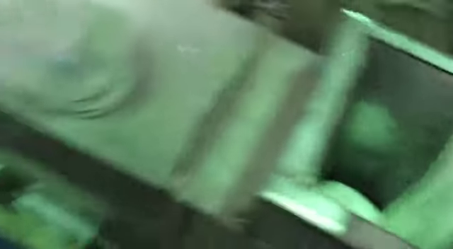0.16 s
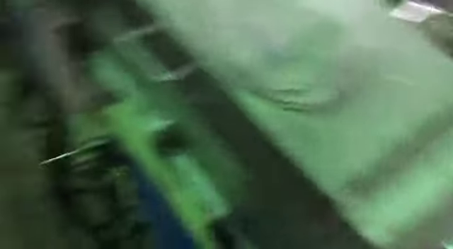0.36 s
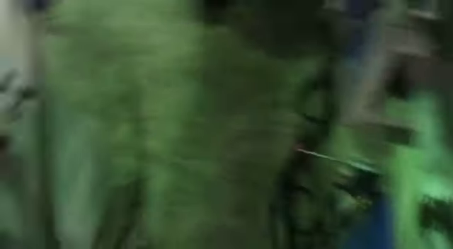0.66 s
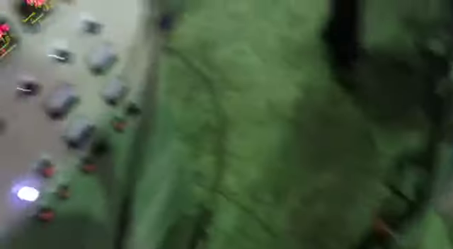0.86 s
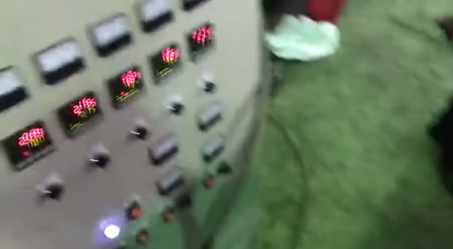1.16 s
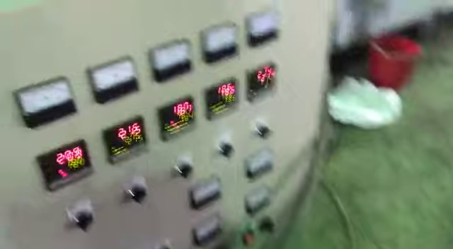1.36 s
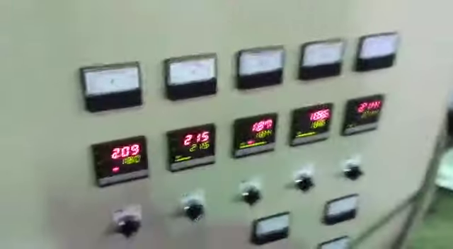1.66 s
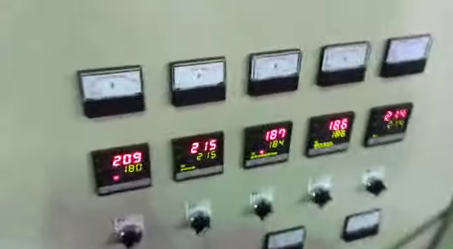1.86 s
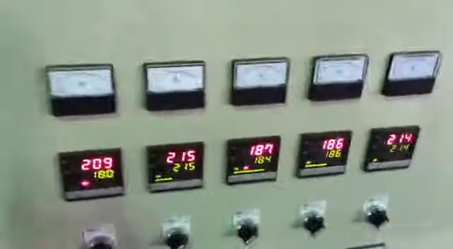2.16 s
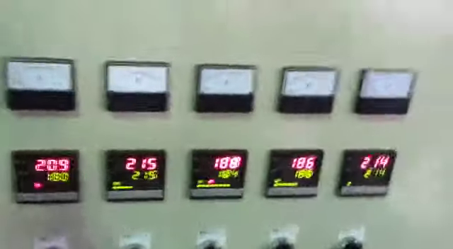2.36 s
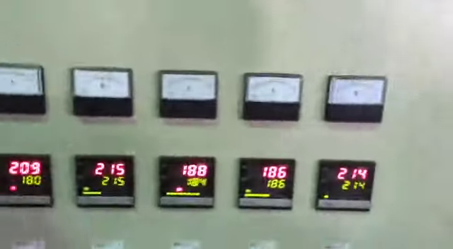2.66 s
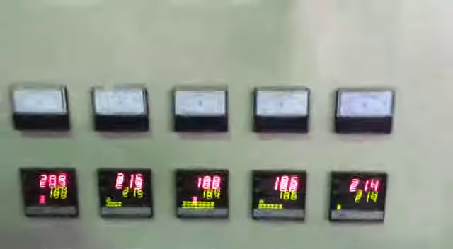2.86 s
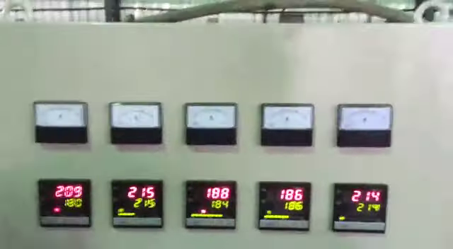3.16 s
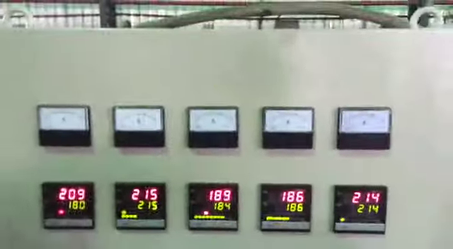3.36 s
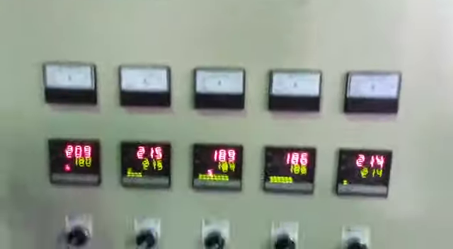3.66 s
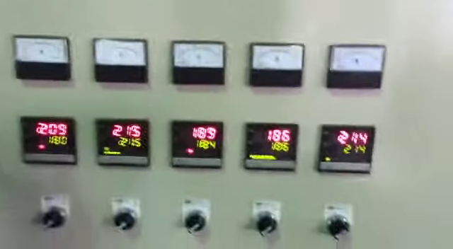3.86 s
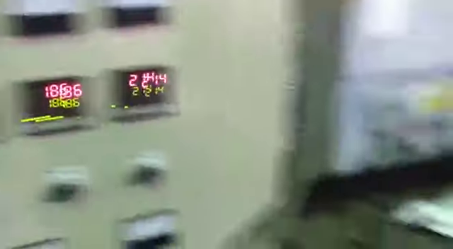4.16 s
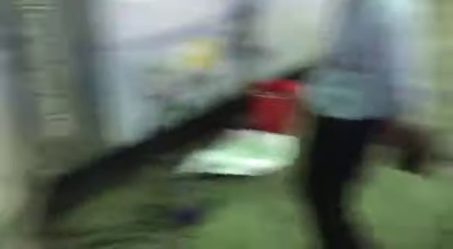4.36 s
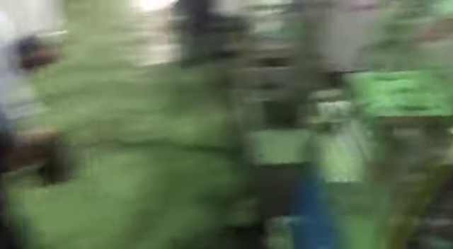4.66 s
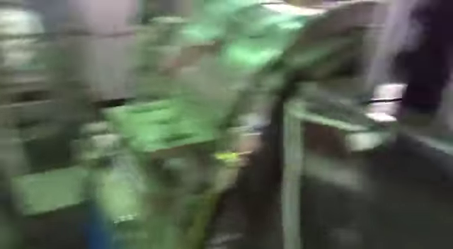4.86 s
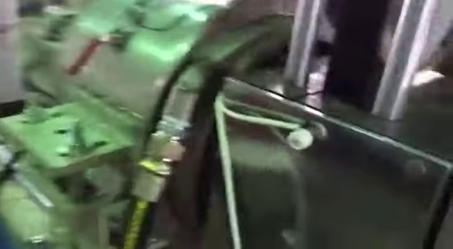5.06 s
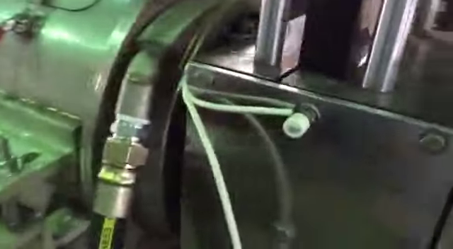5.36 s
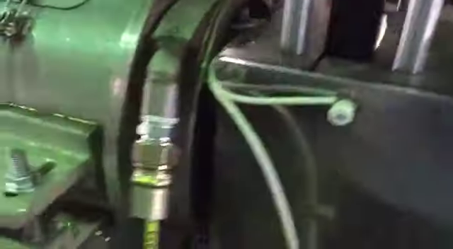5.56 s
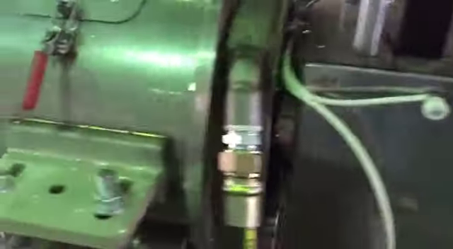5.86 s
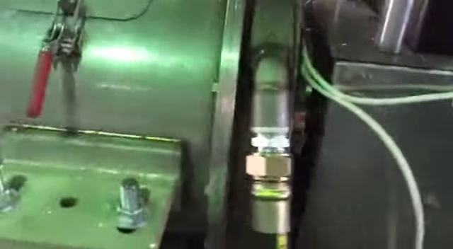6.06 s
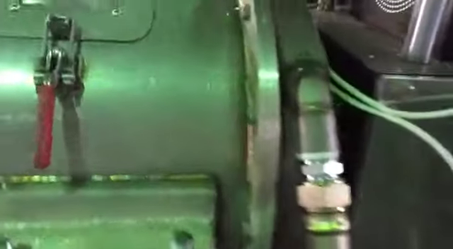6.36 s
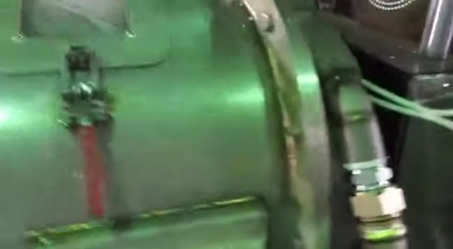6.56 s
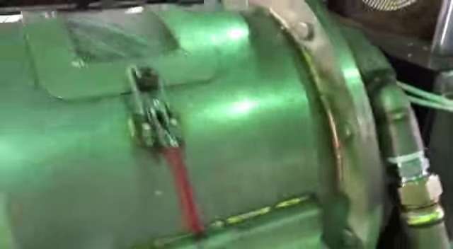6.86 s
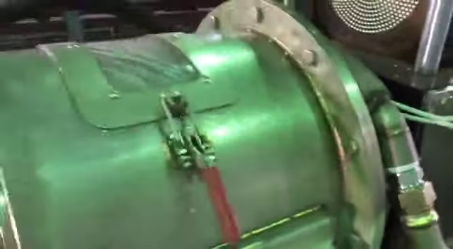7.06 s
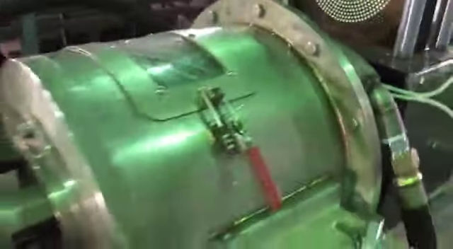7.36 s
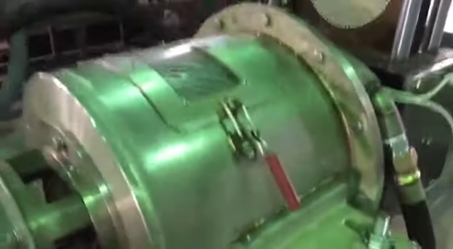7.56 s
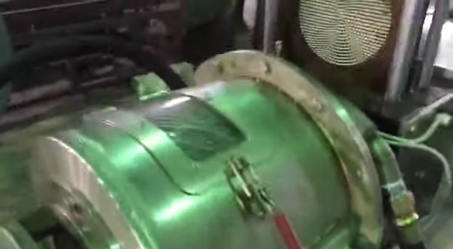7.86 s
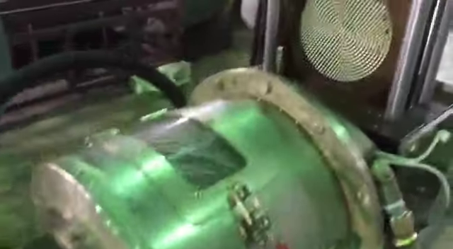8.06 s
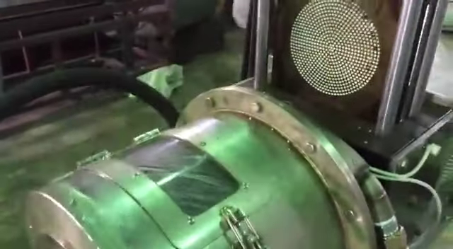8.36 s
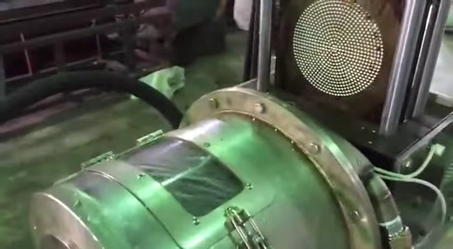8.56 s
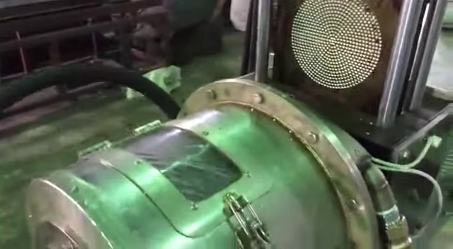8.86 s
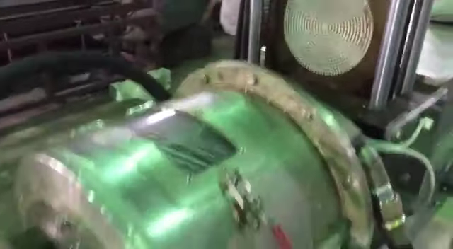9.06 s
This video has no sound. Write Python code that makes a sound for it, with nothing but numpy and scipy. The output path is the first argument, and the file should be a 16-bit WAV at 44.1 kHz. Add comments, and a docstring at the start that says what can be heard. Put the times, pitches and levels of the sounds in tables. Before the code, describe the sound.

Inside a busy workshop, a plastic recycling machine runs without pause. A low, hollow drone throbs irregularly over rumble, motor hum and a rushing blower, while water churns, pellets patter and spray hisses in quick surges. Brief mid-pitched whines rise and fade. One handheld microphone moves from a control panel to a steel drum, with only slight changes in balance.

```python
"""Plastic recycling line in a workshop

A hollow, unsteady drone throbs over motor hum, brief whines and the noise of the hall, while water churns
in a steel drum, pellets patter and a fine spray hisses in quick surges. One microphone is carried from the
control panel to the cutter drum. Tones are drifting sines; air and water are noise shaped by spectra;
the drone is a sung note beating against noise that rings the drum."""
import sys
import numpy as np
from scipy import signal
from scipy.fft import rfft, irfft, next_fast_len
from scipy.io import wavfile
from scipy.ndimage import uniform_filter1d, map_coordinates

SR = 44100
rng = np.random.default_rng(int(sys.argv[2]) if len(sys.argv) > 2 else 0)


def store_wav(level_fs):
    """Save 16-bit WAV to argv[1]."""
    pcm = np.round(np.clip(np.atleast_2d(level_fs), -1, 1) * 32767)
    wavfile.write(sys.argv[1], SR, pcm.T.astype(np.int16))


N = 406161  # length [samples]


def amp(db):
    """Turn decibels into a gain."""
    return 10 ** (np.asarray(db) / 20)


def unit(x):
    """Scale a sound to rms 1."""
    return x / np.sqrt(np.mean(x ** 2) + 1e-20)


def curves(rows):
    """Draw straight lines through a table: one curve for each column after the time."""
    times, *columns = np.transpose(rows)
    return [np.interp(np.arange(N) / SR, times, column) for column in columns]


def wobble(rate):
    """A smooth random curve through `rate` random points a second."""
    n = np.arange(0, N + 64, 64)  # worked out every 64 samples, straight lines between
    points = rng.standard_normal(4000)
    curve = map_coordinates(points, [n * rate / SR + 2], mode="wrap")
    return np.interp(np.arange(N), n, curve)


def swell(start, length, attack_s, release_s):
    """An envelope that rises until start, holds for length and falls again."""
    corners = np.cumsum([start - abs(attack_s), abs(attack_s), abs(length), abs(release_s)])
    return np.interp(np.arange(N) / SR, corners, [0, 1, 1, 0])


def filtered(x, response):
    """Multiply the spectrum of a sound by a gain that depends on frequency."""
    m = next_fast_len(N + SR // 2)
    hz = np.fft.rfftfreq(m, 1 / SR)
    return irfft(rfft(x, m) * response(hz), m)[:N]


def coloured(x, spectrum):
    """Shape a sound by a spectrum table, joined up on a log frequency axis, at rms 1."""
    f, db = np.transpose(spectrum)
    return unit(filtered(x, lambda hz: amp(np.interp(np.log(hz + 1), np.log(f), db))))


def turbulence(patchy_db):
    """White noise with short patches of random gain in time and frequency."""
    z = signal.stft(rng.standard_normal(N), nperseg=512)[2]
    field = uniform_filter1d(rng.standard_normal(z.shape), size=10, axis=0)
    field = uniform_filter1d(field, size=9, axis=1)
    return signal.istft(z * amp(patchy_db * unit(field)), nperseg=512)[1][:N]


def tone(hz, wander_hz, rate):
    """A sine of rms 1 whose pitch drifts at random."""
    cycles = np.cumsum(hz + wander_hz * wobble(rate)) / SR
    return np.sqrt(2) * np.sin(2 * np.pi * (cycles + rng.random()))


def patter(per_second, spread_db):
    """Tiny impacts at random moments and of random sizes."""
    struck = rng.random(N) < per_second / SR
    sizes = rng.standard_normal(N) * amp(spread_db * rng.standard_normal(N))
    return unit(struck * sizes)


def ribbed(x, depth_db, spacing_hz):
    """The many close modes of a steel shell comb a sound with narrow fixed peaks."""
    peaks = rng.uniform(-1.1, 1, size=4000)
    return unit(filtered(x, lambda hz: amp(depth_db * map_coordinates(peaks, [hz / spacing_hz], mode="wrap"))))


def passing_walls(x, share, delay_s, sway_s, count=3):
    """Echoes from nearby panels and the floor, whose paths shift as the microphone is carried along."""
    n = np.arange(N)
    echoes = np.zeros(N)
    for k in range(count):
        delay = delay_s * (k + 1) + sway_s * wobble(.9)
        echoes += np.interp(n - SR * delay, n, x)
    return unit(x + share * echoes)


LEAVE_PANEL_S, REACH_DRUM_S = 3.8, 5.1


def nearness():
    """The walk: 0 at the control panel, 1 beside the drum."""
    return np.interp(np.arange(N) / SR, [LEAVE_PANEL_S, REACH_DRUM_S], [0, 1])


# spectrum of the low rumble: (frequency [Hz], level [dB per Hz])
RUMBLE_SPECTRUM = [(10, -35), (22, -23), (45, -16.5), (70, -9), (110, -4.5), (160, -1.5), (220, -2.5),
                   (260, -11.5), (300, -10), (600, -45)]
RUMBLE_DB, RUMBLE_NEAR_DB = -25.5, 1  # at the panel, and the gain beside the drum


def rumble():
    """Machines rumble through the hall: low noise that slowly rises and falls."""
    level_db = RUMBLE_DB + RUMBLE_NEAR_DB * nearness() + 1.9 * wobble(4.6)
    return amp(level_db) * coloured(rng.standard_normal(N), RUMBLE_SPECTRUM)


# steady noise along the walk, before a fixed trim:
# (time [s], roar level [dB], blower level [dB], hiss level [dB])
RUSH_LEVELS = [(0, -29.5, -32.5, -35), (0.6, -28.5, -34.5, -37.0), (1.1, -27.5, -32.5, -35.5),
               (1.65, -26.0, -28.5, -35.5), (2.1, -29, -32.5, -38), (3, -26, -32, -36.5),
               (3.6, -25.5, -34, -33.5), (4.1, -24.5, -30.5, -34.5), (4.6, -24.5, -30.5, -31.5),
               (5.2, -26, -31, -32), (5.75, -25.5, -28.5, -32.5), (6.6, -26, -31, -34.5),
               (7.6, -26.5, -29.5, -34), (8.4, -28, -30.5, -33.0), (9.21, -27.5, -31, -34)]
# spectra of the machine roar, the blower, its duct and the air jet: (frequency [Hz], level [dB per Hz])
ROAR_SPECTRUM = [(120, -31), (240, -10), (300, -3), (338, -2), (364, 3), (390, -0.1), (420, -1.5),
                 (480, -3.5), (560, -4.5), (630, -4.5), (800, -12), (1400, -35), (4000, -45)]
BLOWER_SPECTRUM = [(300, -18), (600, -7), (720, 0), (800, -2.5), (860, 0.5), (960, 1), (1040, -1),
                   (1200, -1.5), (1500, -19.5), (4000, -43)]
DUCT_SPECTRUM = [(700, -28), (1100, -9), (1350, 1), (1580, -0.5), (1720, 2), (1950, -2.5), (2120, -6),
                 (2300, -5), (2800, -10.5), (4500, -17), (11000, -40)]
HISS_SPECTRUM = [(1000, -11), (3000, -4), (4500, -0.5), (6000, 0), (7500, 1), (8500, -2), (10400, 1.5),
                 (11000, -19)]
DUCT_DB, DUCT_NEAR_DB = -30, 1.25  # at the panel, and the gain beside the drum


def rush():
    """Machines roar, a blower rushes through its duct and an air jet hisses, all echoing off the walls."""
    roar_db, blower_db, hiss_db = curves(RUSH_LEVELS)
    duct_db = DUCT_DB + DUCT_NEAR_DB * nearness()
    roar = amp(roar_db - 0.48) * coloured(turbulence(patchy_db=1.32), ROAR_SPECTRUM)
    blower = amp(blower_db + 1.27) * coloured(turbulence(patchy_db=1.27), BLOWER_SPECTRUM)
    duct = amp(duct_db) * coloured(turbulence(patchy_db=1.65), DUCT_SPECTRUM)
    hiss = amp(hiss_db + 4.0) * coloured(turbulence(patchy_db=1.5), HISS_SPECTRUM)
    direct = roar + blower + duct + hiss
    # the echoes leave the overall level as it was
    return np.std(direct) * passing_walls(direct, share=0.13, delay_s=.009, sway_s=0.000505)


# faint hum of the heaters and gearbox, and whine of the motor drives: (frequency [Hz], level [dB])
HUM_TONES = [(119.8, -42), (134.5, -41), (149, -48), (484.5, -47), (1107.6, -50), (1382, -51), (2222, -62),
             (4160, -64), (7090, -57), (8002, -60), (8450, -46), (8700, -55)]


def hum():
    """Heaters, gearbox and drives hum faintly, each a sine that wavers a little in pitch and level."""
    out = np.zeros(N)
    for hz, db in HUM_TONES:
        out += amp(db + 1.4 * wobble(2.62)) * tone(hz, wander_hz=0.00149 * hz, rate=7)
    return out


# motor and pump tones: (frequency [Hz], level at the panel [dB], level at the drum [dB], wander [Hz])
MOTOR_TONES = [(74.5, -38.5, -40, .25), (89.9, -42, -33, .25), (242.6, -36.5, -36.5, 0.68),
               (327.2, -41, -43, 0.55), (689.4, -48, -42, 0.57)]
FADE_DB, FADE_PER_S = 2, 2.34  # size and pace of the fading


def motors():
    """Motors and pumps hum at drifting pitches, fading in and out in the standing waves of the hall."""
    out, near = np.zeros(N), nearness()
    for hz, panel_db, drum_db, wander_hz in MOTOR_TONES:
        level_db = panel_db + (drum_db - panel_db) * near
        level_db = level_db + FADE_DB * wobble(FADE_PER_S) + 0.68 * wobble(12)
        out += amp(level_db) * tone(hz, wander_hz, rate=6)
    return out


# moments when a shaft or pump tone rises above the hum:
# (start of full level [s], time held [s], frequency [Hz], level [dB])
SHAFT_WHINES = [(.52, 0.61, 701, -35.5), (0.813, 0.74, 329.3, -30.5), (1.17, 0.62, 648, -45),
                (1.4, .45, 677, -37.5), (2.85, 0.73, 698, -35.5), (3.05, 0.55, 708, -41),
                (3.7, .4, 242.5, -31.5), (4.1, .42, 688, -33.5), (4.18, .7, 708, -38),
                (5.73, 0.57, 689, -30.5), (6.0, 0.79, 328, -31.5), (6.75, 1.2, 691, -39.5),
                (7.95, 0.53, 331.8, -31.5)]
WHINE_ATTACK_S, WHINE_RELEASE_S = 0.12, 0.17


def shafts():
    """Each shaft or pump whine swells, holds its slightly wavering pitch and fades."""
    out = np.zeros(N)
    for start, length, hz, db in SHAFT_WHINES:
        envelope = swell(start, length, WHINE_ATTACK_S, WHINE_RELEASE_S)
        out += amp(db) * envelope * tone(hz, wander_hz=0.93, rate=10)
    return out * amp(1.4 * wobble(12))  # all waver together


# water round the cutter along the walk, before trims and surges:
# (time [s], churn level [dB], spray level [dB])
WATER_LEVELS = [(0, -32, -32.0), (0.5, -33, -35), (1.4, -30.5, -30.5), (2.3, -33, -35.0), (2.9, -29.5, -32),
                (3.5, -33, -34.5), (4.25, -32.5, -33), (4.6, -31, -29.0), (5.6, -30.5, -31),
                (6.3, -32.5, -31), (6.7, -29, -31.0), (7.1, -30.5, -32.5), (7.45, -27.5, -28.5),
                (8.3, -29.5, -31), (9.21, -29.5, -28)]
# spectra of the churn with its pellets, and of the spray: (frequency [Hz], level [dB per Hz])
CHURN_SPECTRUM = [(600, -23), (1400, -1.5), (2200, 4), (2800, 1.5), (4100, -2.5), (4450, -10), (7000, -10),
                  (11000, -27)]
SPRAY_SPECTRUM = [(3000, -42), (6000, -22), (7500, -6.5), (8050, 3), (8600, 3.5), (9300, 3), (10200, -3),
                  (11000, -13)]
SLAPS_PER_S, SLAP_SCATTER_PER_S, SLAP_DB = 9.6, 3.93, 1.15  # uneven slaps on the drum wall; rms depth
HEAVE_DB, HEAVE_PER_S = 0.34, 6.5  # the slower heaving of the water


def water():
    """Water slaps round the drum, flinging pellets at the wall and throwing off spray."""
    churn_db, spray_db = curves(WATER_LEVELS)
    pellets = turbulence(patchy_db=2.0) + 0.53 * patter(per_second=3500, spread_db=1.0)
    drops = turbulence(patchy_db=1.2) + 0.39 * patter(per_second=5400, spread_db=1.0)
    pellets = ribbed(coloured(pellets, CHURN_SPECTRUM), depth_db=3.5, spacing_hz=45.27)
    drops = ribbed(coloured(drops, SPRAY_SPECTRUM), depth_db=4.5, spacing_hz=45.0)
    # one surge drives both pellets and spray; each breaks it into quicker splashes of its own
    slaps_db = SLAP_DB * tone(SLAPS_PER_S, wander_hz=SLAP_SCATTER_PER_S, rate=12)
    surge_db = slaps_db + HEAVE_DB * wobble(HEAVE_PER_S)
    churn = amp(churn_db - 1.07 + surge_db + 1.5 * wobble(40)) * pellets
    spray = amp(spray_db - 1.0 + 0.8 * surge_db + 1.43 * wobble(32)) * drops
    return churn + spray


# the drone between its strongest throbs, before flutter and trim: (time [s], level [dB])
DRONE_LEVELS = [(0, -18.5), (2.3, -23.5), (3.8, -22), (4.8, -23), (5.5, -23.5), (6.2, -20.5), (7.2, -24),
                (8.2, -22), (9.21, -20.5)]
# its strongest throbs, before trim: (start of full level [s], time held [s], level [dB])
DRONE_THROBS = [(0.11, 0.064, -17.5), (0.282, 0.14, -12.5), (0.547, 0.045, -17.5), (0.66, 0.091, -19),
                (0.86, 0.19, -17), (1.18, 0.032, -17), (1.517, 0.094, -15.5), (1.796, 0.14, -17.5),
                (2.031, 0.32, -15.5), (2.654, 0.099, -16), (3.087, 0.15, -16.5), (3.568, 0.11, -17.5),
                (4.177, 0.11, -18.5), (6.095, 0.093, -16), (6.306, 0.032, -17.5), (6.404, 0.042, -18),
                (7.629, 0.05, -17), (7.984, 0.054, -16), (8.774, 0.036, -17), (9.025, 0.039, -13.5)]
THROB_DB, THROB_ATTACK_S, THROB_RELEASE_S = 0.17, 0.016, 0.026  # THROB_DB trims every throb
LULL_AFTER_S, LULL_S, LULL_DB = 0.055, 0.021, -5  # each throb collapses into a short lull
FLUTTER_DB, FLUTTER_PER_S = 2.5, 26  # the lesser throbs in between


def throbbing():
    """The drone's level in dB: flutter, then lulls, then the strongest throbs laid over both."""
    level_db = curves(DRONE_LEVELS)[0] + FLUTTER_DB * wobble(FLUTTER_PER_S)
    for start, length, _ in DRONE_THROBS:
        lull_start = start + length + LULL_AFTER_S
        level_db = level_db + LULL_DB * swell(lull_start, LULL_S, THROB_RELEASE_S, THROB_ATTACK_S)
    for start, length, db in DRONE_THROBS:
        envelope = swell(start, length, THROB_ATTACK_S, THROB_RELEASE_S)
        level_db = level_db + (db + THROB_DB - level_db) * envelope
    return level_db


# resonances of the drum and its pipes: (frequency [Hz], width [Hz], level [dB])
DRUM_RESONANCES = [(174.6, 14, -2), (189.7, 20, 2), (163.8, 5.4, -5), (204, 30, -13)]


def drum_response(f):
    """The gain of the steel drum: a few resonance peaks added as power."""
    power = 0
    for hz, width, db in DRUM_RESONANCES:
        power = power + amp(db) ** 2 / (1 + (2 * (f - hz) / width) ** 2) ** 2.0
    return np.sqrt(power)


def drone():
    """The spinning cutter sings one unsteady note; turbulence rings the drum around it, and the two beat."""
    level_db = throbbing()
    swell_db = level_db - np.mean(level_db)
    note = tone(180.5, wander_hz=1.67, rate=10)
    ring = unit(filtered(rng.standard_normal(N), drum_response))
    # the note stands out in the swells, the ringing fills the lulls
    beat = amp(.5 * swell_db + .4) * note + ring
    # the swing of the drum levels off, so each throb keeps a more even strength
    swing = np.abs(signal.hilbert(beat, next_fast_len(N)))[:N]
    return amp(level_db - 0.6) * unit(beat / (swing + 0.53))


def scene():
    """All sources meet at one microphone, which feeds both channels."""
    mono = rumble() + rush() + hum() + motors() + shafts() + water() + drone()
    return np.array([mono, mono])


TOP_HZ = 10680  # upper band limit


def record(dry):
    """The recorder cuts off very steeply above its band limit."""
    return np.array([filtered(x, lambda hz: 1 / np.sqrt(1 + (hz / TOP_HZ) ** 200)) for x in dry])


dry = scene()
out = record(dry)
store_wav(out)
```